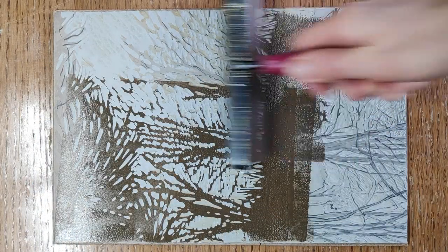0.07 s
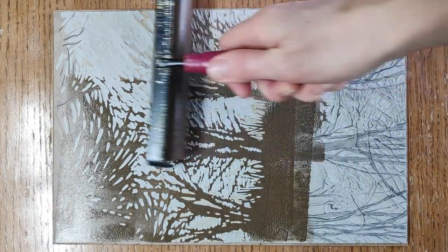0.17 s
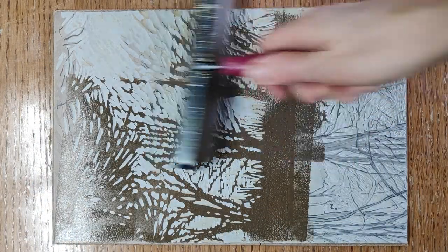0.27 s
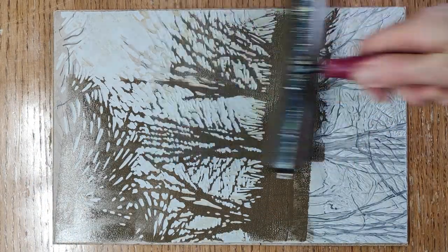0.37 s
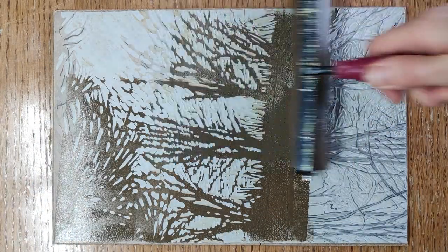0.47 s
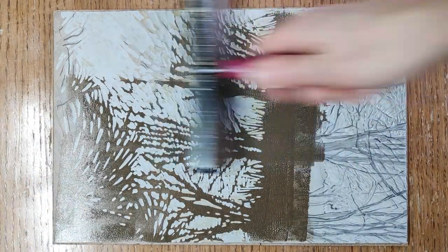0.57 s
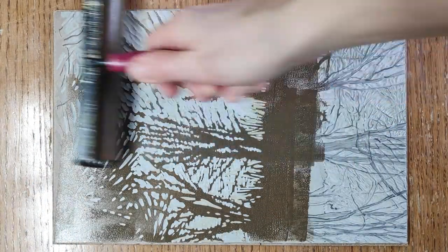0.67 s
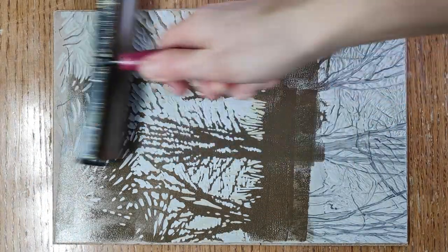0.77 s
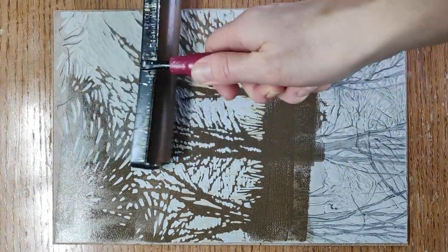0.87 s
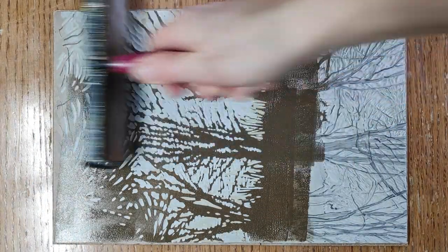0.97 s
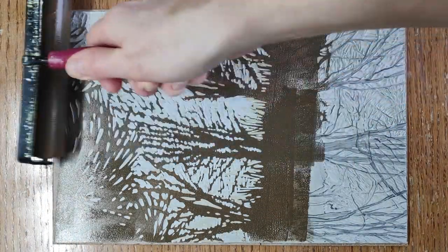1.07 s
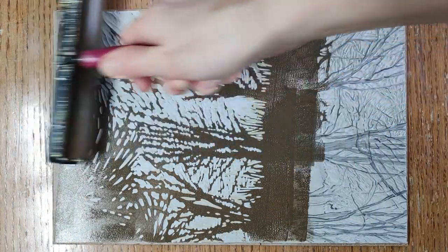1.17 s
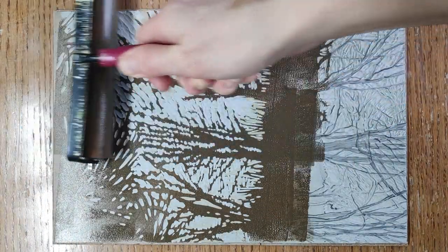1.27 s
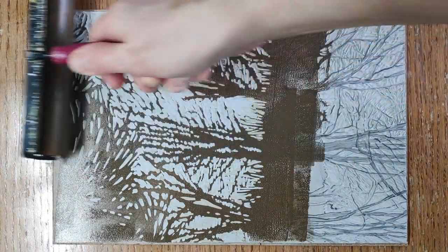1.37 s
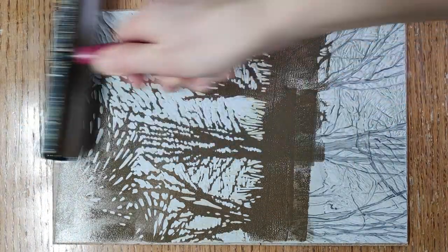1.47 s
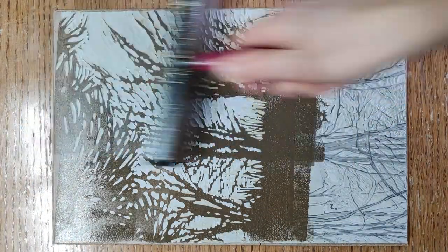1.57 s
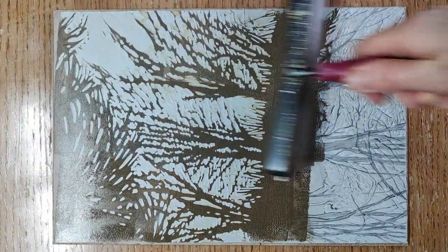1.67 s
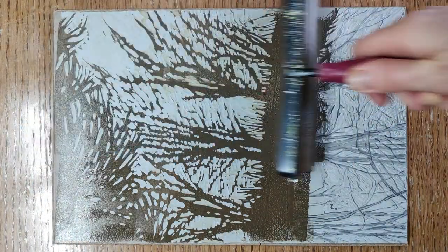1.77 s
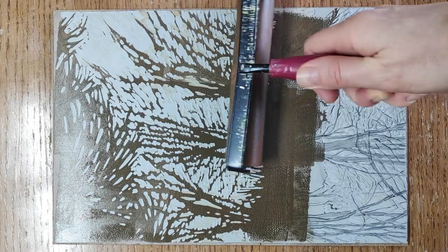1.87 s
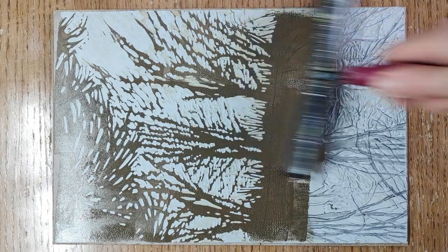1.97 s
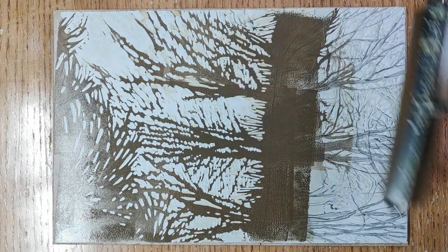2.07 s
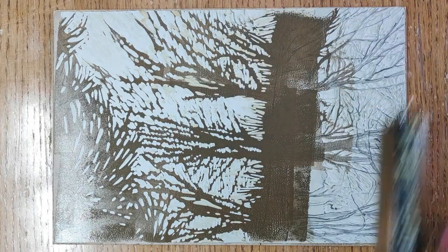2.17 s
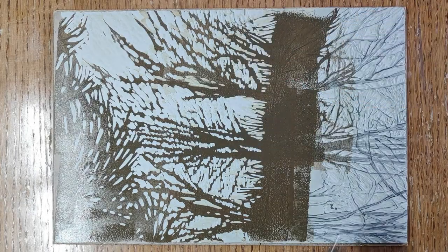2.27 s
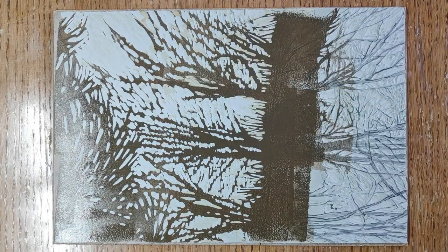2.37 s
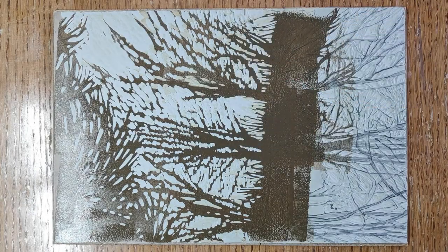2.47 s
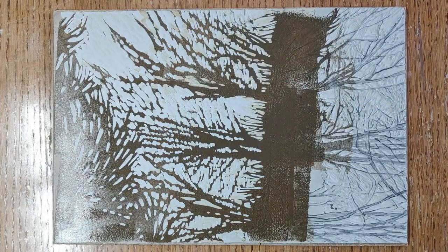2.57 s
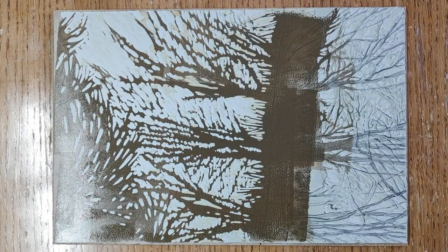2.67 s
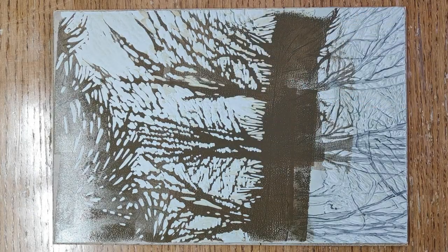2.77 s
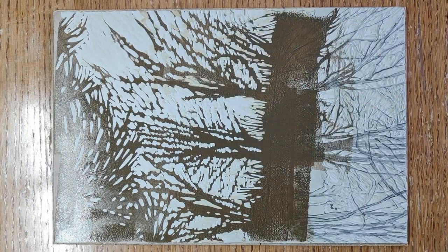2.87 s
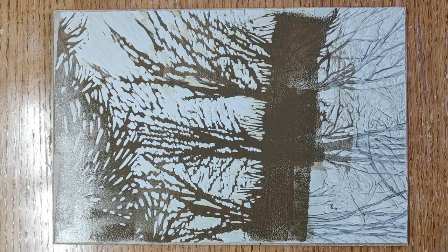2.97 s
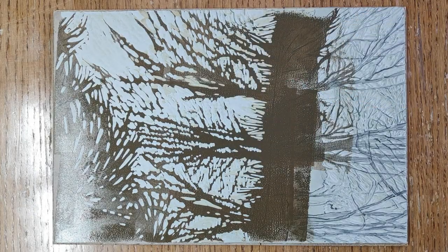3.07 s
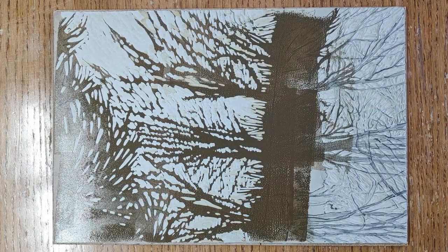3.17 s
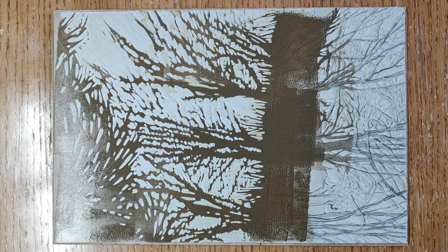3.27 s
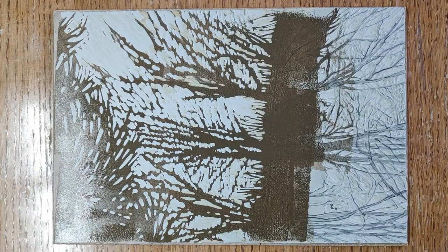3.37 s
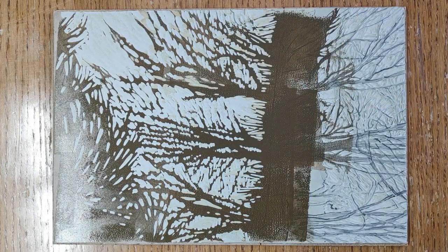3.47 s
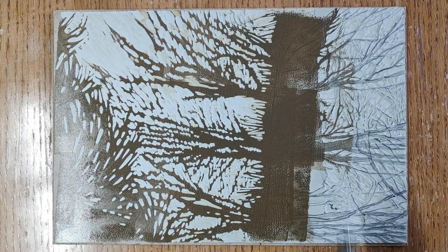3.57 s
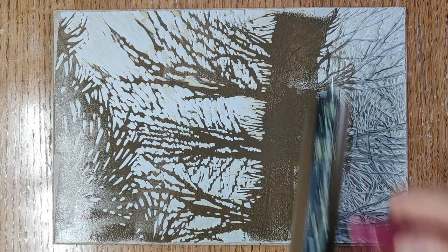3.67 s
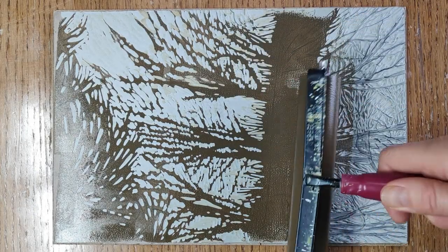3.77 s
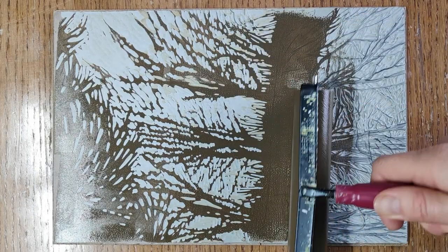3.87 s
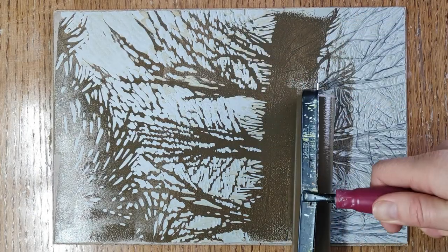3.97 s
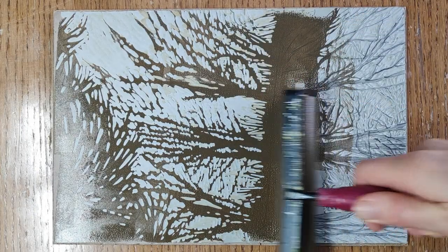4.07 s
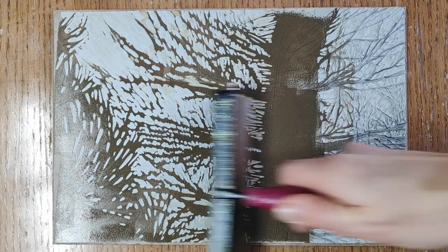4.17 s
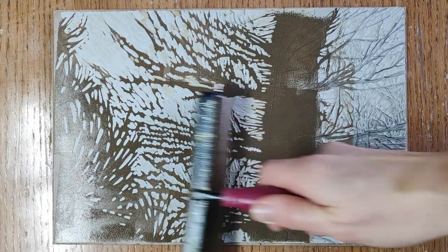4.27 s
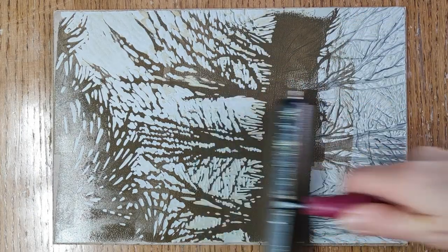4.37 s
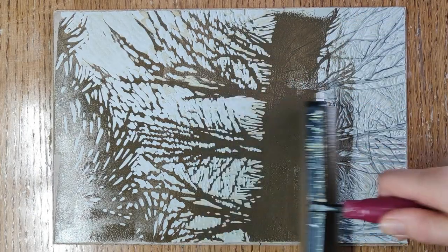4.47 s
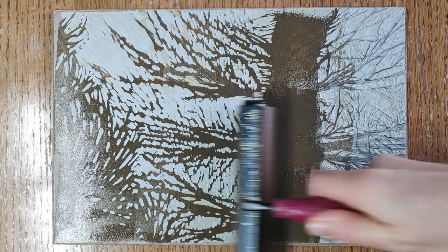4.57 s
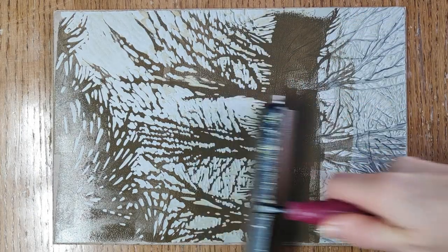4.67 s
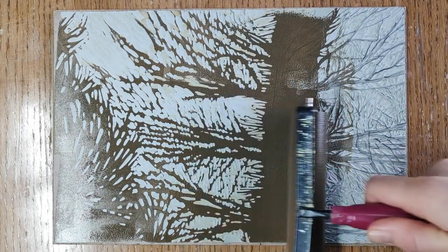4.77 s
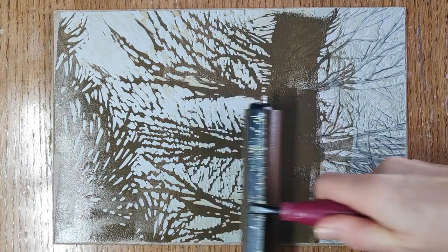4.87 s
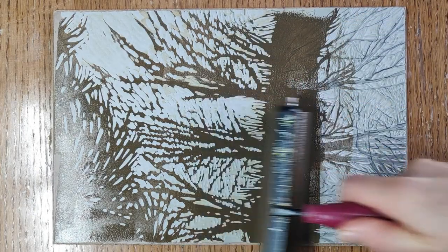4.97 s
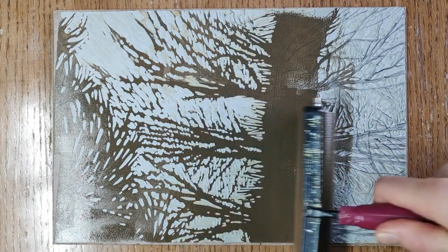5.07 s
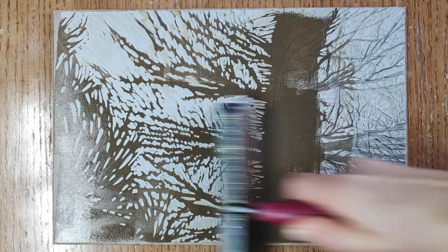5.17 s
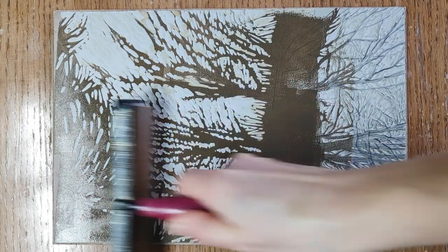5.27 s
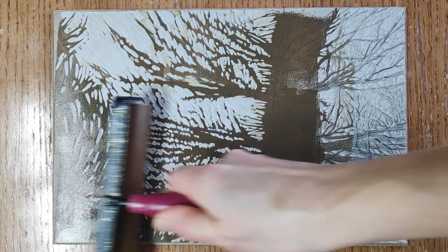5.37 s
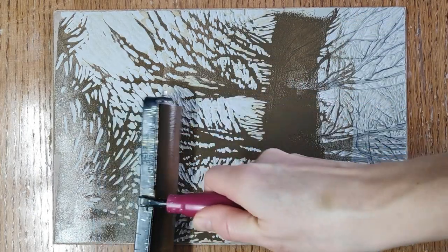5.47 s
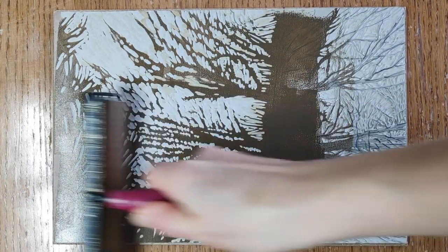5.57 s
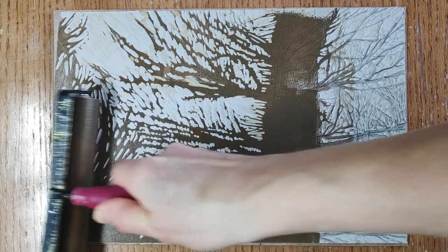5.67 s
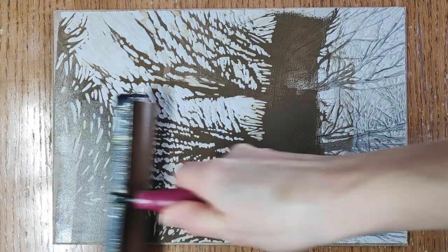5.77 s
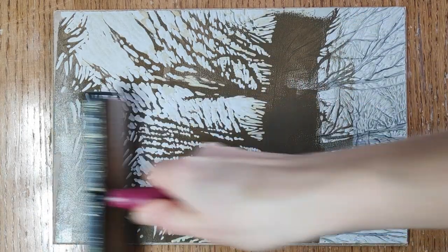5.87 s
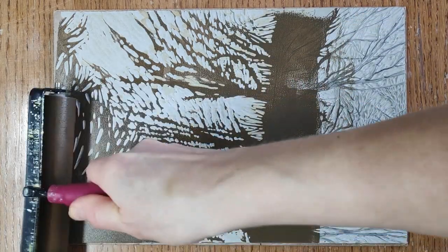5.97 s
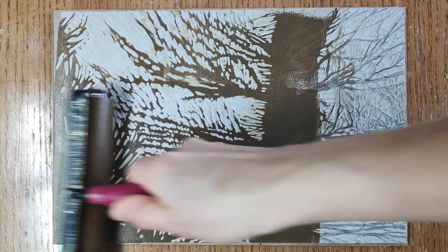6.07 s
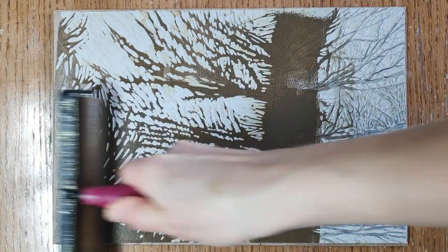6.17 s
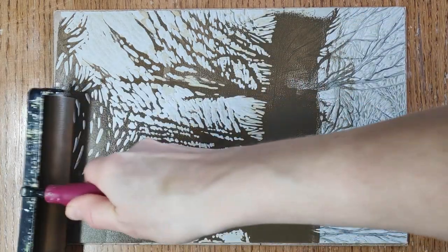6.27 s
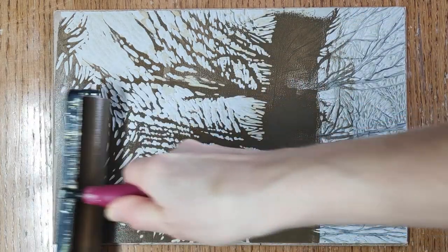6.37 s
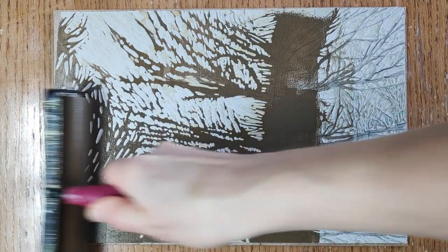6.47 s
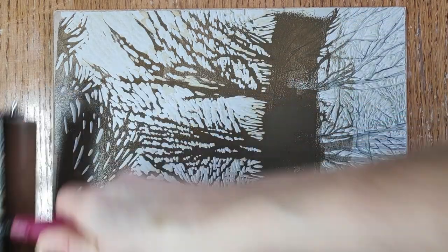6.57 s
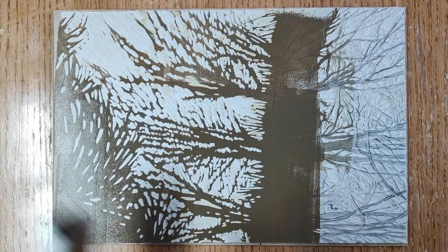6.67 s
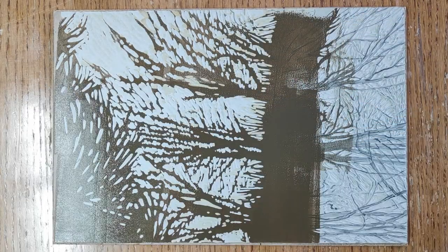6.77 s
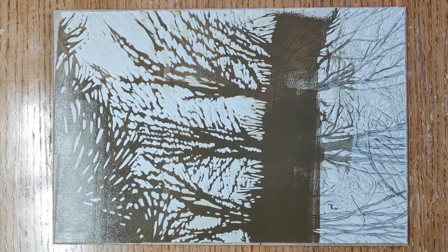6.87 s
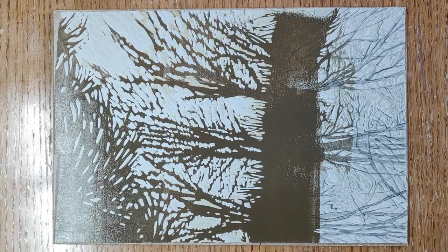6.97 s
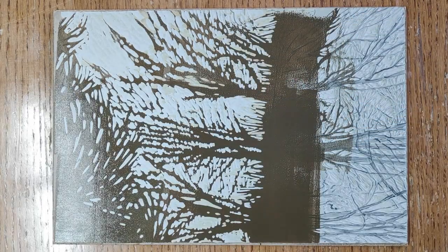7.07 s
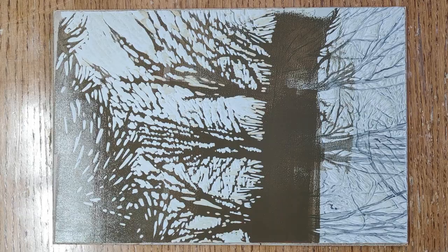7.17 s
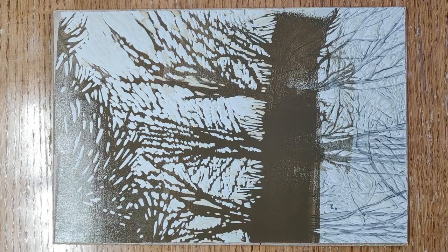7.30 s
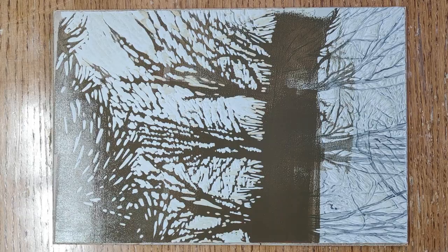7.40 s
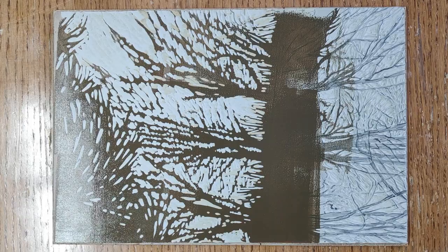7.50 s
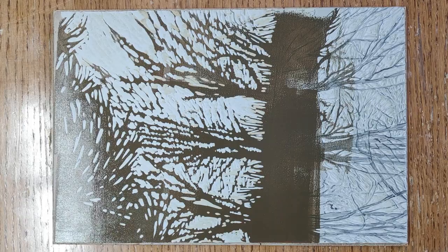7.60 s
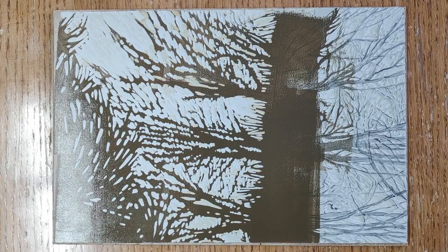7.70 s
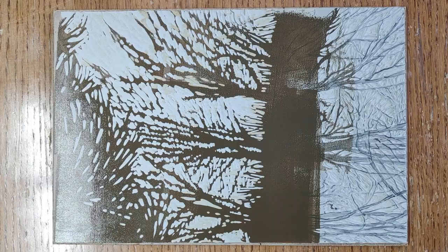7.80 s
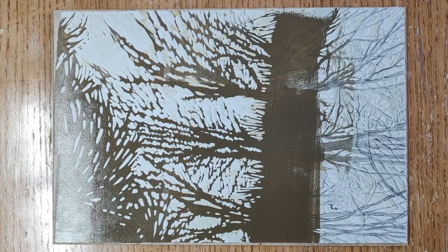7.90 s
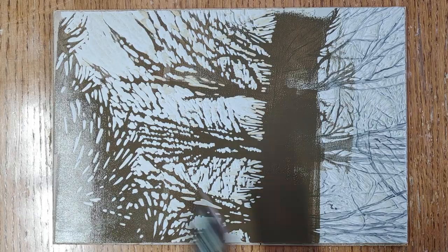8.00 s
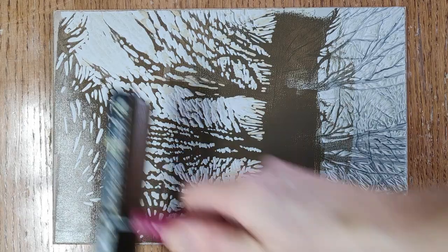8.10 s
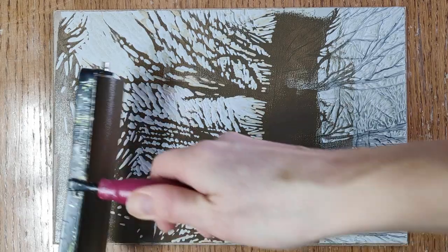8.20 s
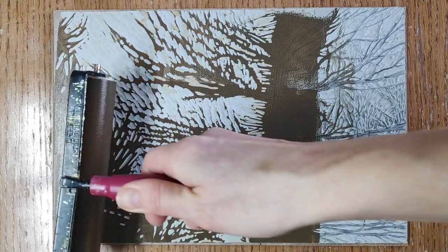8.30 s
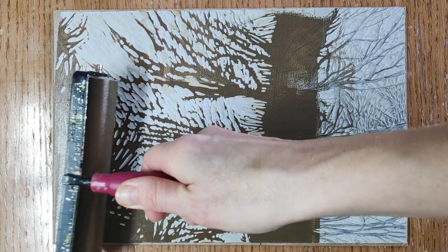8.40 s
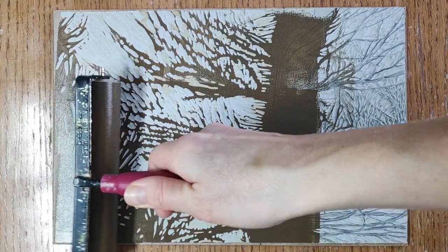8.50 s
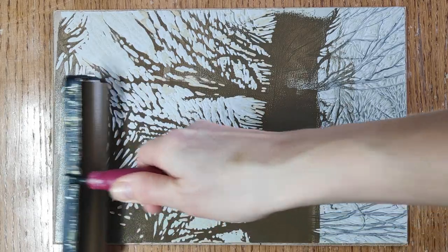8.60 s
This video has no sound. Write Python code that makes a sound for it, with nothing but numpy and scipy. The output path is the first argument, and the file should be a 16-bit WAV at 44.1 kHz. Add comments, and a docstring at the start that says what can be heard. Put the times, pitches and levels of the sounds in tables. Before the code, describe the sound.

A tacky ink roller hisses back and forth over a carved block, rumbling the table, its metal frame rattling whenever it is lifted, re-inked and set down.

```python
"""A hand roller is pushed to and fro over a carved block on a wooden table, and twice re-inked on a slab.
Tacky ink tears with a hiss of shaped noise, and the rubber rasps through resonances of block or slab.
Shaking, jolts over ridges and soft pushes rumble in the table; short chirps sound during strokes on the slab.
The loose metal frame rattles in bright cracks with a knock and a ring, mostly as the roller is lifted or set down.
A quiet room lies beneath, and two small microphone ports each add their own treble peak."""
import sys
import numpy as np
from scipy import signal
from scipy.fft import rfft, irfft, next_fast_len
from scipy.io import wavfile
from scipy.ndimage import uniform_filter1d, map_coordinates

SR = 44100
rng = np.random.default_rng(int(sys.argv[2]) if len(sys.argv) > 2 else 0)


def store_pcm(level_fs):
    """Save levels as 16-bit WAV."""
    pcm = np.round(np.clip(level_fs, -1, 1) * 32767).astype(np.int16)
    wavfile.write(sys.argv[1], SR, np.atleast_2d(pcm).T)


N = 381024

# Quiet room noise: f/Hz, relative level per Hz/dB
AIR = [(25, -1.5), (90, 3.5), (200, -8.5), (350, -11.5), (900, -18.5), (2500, -23), (6000, -24.5),
       (15000, -36)]
# How alike left and right are in the room noise: f/Hz, likeness (-1 to 1)
AIR_ALIKE = [(60, 0.51), (240, 0.73), (950, -0.32), (3770, -0.37), (15000, -0.5)]
# Strokes of the roller: way, start t/s, end t/s, early hiss level/dB, late hiss level/dB,
# rasp level over hiss/dB, rumble level/dB, centre of the rumble f/Hz
STROKES = [("push", 0.0033, 0.27, -52.5, -50, -10, -49.5, 192),
           ("pull", 0.29, 0.51, -57, -41, -11.5, -50, 155),
           ("push", 0.53, 0.82, -43, -57.5, -8, -44.5, 217),
           ("pull", 0.833, 0.97, -52, -65, -10, -48.5, 133),
           ("push", 0.97, 1.163, -53.5, -56, -8.5, -45, 164),
           ("pull", 1.2, 1.312, -61.5, -56, -12, -51, 170),
           ("push", 1.357, 1.494, -53.5, -63.5, -11.5, -52, 210),
           ("pull", 1.493, 1.804, -58, -44, -7, -41.5, 175),
           ("push", 1.8, 1.943, -56.5, -47, -14, -56.5, 210),
           ("pull", 1.963, 2.064, -61.5, -38.5, -12, -52.5, 160),
           ("push", 2.026, 2.128, -55, -41, -10.5, -48, 250),
           ("push", 2.678, 2.921, -49, -34.5, -11, -52, 177),
           ("pull", 2.945, 3.152, -37, -36, -12, -52, 158),
           ("push", 3.16, 3.38, -33.5, -40.5, -13, -53, 176),
           ("pull", 3.383, 3.56, -38, -35, -13.5, -52, 100),
           ("push", 4.06, 4.319, -57.5, -45, -13.5, -48.5, 173),
           ("pull", 4.326, 4.53, -49, -51, -13, -49.5, 154),
           ("push", 4.538, 4.682, -48, -48, -16, -57, 170),
           ("pull", 4.693, 4.814, -62.5, -38, -17, -58, 190),
           ("push", 4.852, 4.971, -51.5, -49, -18, -55.5, 220),
           ("pull", 4.977, 5.158, -58.5, -54.5, -17.5, -64.5, 120),
           ("push", 5.149, 5.267, -51.5, -44.5, -14.5, -54.5, 160),
           ("push", 5.24, 5.413, -53, -65.5, -8.5, -48.5, 157),
           ("pull", 5.411, 5.555, -54.5, -63.5, -12, -58.5, 190),
           ("push", 5.54, 5.718, -58.5, -42.5, -14, -49, 220),
           ("pull", 5.738, 5.881, -50, -51, -12, -44.5, 180),
           ("push", 5.906, 6.053, -43.5, -55, -12, -44.5, 194),
           ("pull", 6.06, 6.2, -58, -49.5, -13, -47, 190),
           ("push", 6.194, 6.347, -47, -58.5, -14, -51, 190),
           ("pull", 6.365, 6.493, -52.5, -61.5, -14, -52, 155),
           ("push", 6.49, 6.62, -54.5, -57, -11, -48, 190), ("push", 7.128, 7.362, -47, -36, -9, -51, 190),
           ("pull", 7.387, 7.599, -37.5, -37.5, -12.5, -51.5, 167),
           ("push", 7.593, 7.787, -38.5, -37.5, -11.5, -53.5, 190),
           ("pull", 7.786, 7.944, -40, -34, -13, -51.5, 133)]
# Time spent on the ink slab: start t/s, end t/s
SLAB_RUNS = [(2.64, 3.66), (7.115, 8.08)]
# The roller tilts with the way it runs, so the hiss leans: way -> left over right level/dB
ON_BLOCK_PAN_DB = {"push": -0.4, "pull": 5.5}
ON_SLAB_PAN_DB = {"push": -1.6, "pull": 1.5}
# The ink lets go all at once as a stroke sets off: t/s, hiss level/dB
GRABS = [(0.853, -62), (2.961, -49.5), (4.3515, -51), (5.918, -59), (6.2128, -56), (6.5141, -56),
         (7.4, -52)]
# Colour of the tearing ink: f/Hz, relative level per Hz/dB
INK = [(2500, -48), (4000, -8), (6000, -4), (9000, -0.5), (12000, 5), (15000, -1)]
# Resonances of the carved block: f/Hz, width/Hz, relative level/dB
BLOCK = [(350, 60, 5.5), (551, 33, 7.5), (747, 180, -3.5), (1027, 61, 2), (1230, 360, -3.5),
         (1736, 410, 1.5), (2400, 1130, -3.5), (3900, 1350, -12.5)]
# Resonances of the ink slab: f/Hz, width/Hz, relative level/dB
SLAB = [(336, 35, 5.5), (423, 46, 5.5), (557, 35, 4.5), (616, 47, 4.5), (760, 240, -3), (1038, 53, 4),
        (1344, 87, 1), (1580, 120, 2.5), (1960, 400, -2), (2704, 235, 1), (3350, 360, -1.5),
        (4400, 450, -0.5)]
# How alike left and right are in rasp and rumble: f/Hz, likeness (-1 to 1)
ALIKE = [(60, 0.94), (180, 1), (550, 0.63), (1650, 0.48), (4970, 0.01), (15000, 0.02)]
# Resonances of the table's boards: f/Hz, width/Hz, relative level/dB
TABLE = [(86.6, 46, -6.5), (100, 24, -2.5), (125.2, 8.3, -1), (174.4, 8.6, -2.5), (204.6, 7.2, -2),
         (233, 24.3, -2.5), (278, 13, -0.5), (344, 43, -8), (416, 50, -7.5), (570, 60, -18.5)]
# The table swaying on its legs: f/Hz, width/Hz, relative level/dB
SWAY = [(37.7, 7, 5.5), (53.7, 19, -8)]
# Roller on the move: start t/s, end t/s
ROLLING = [(0, 2.12), (2.66, 3.56), (4.04, 6.68), (7.13, 7.97)]
# The table shudders on after a landing: t/s, level/dB
LANDINGS = [(2.65, -44), (4.04, -42), (7.126, -41.5), (8.578, -47)]
# The table's sway while it is rolled on: t/s, level/dB
SWAYING = [(0.0, -65), (0.63, -71), (0.82, -59), (1.7, -63), (2.4, -77), (2.63, -82), (2.75, -64),
           (3.5, -58.5), (3.9, -86), (4.02, -85), (4.3, -70), (4.5, -58.5), (5.75, -65.5), (5.92, -60),
           (6.25, -72), (6.6, -64), (7.0, -90), (7.11, -86), (7.25, -61.5), (7.95, -53.5), (8.45, -86)]
# The roller jolts over a tall ridge: t/s, peak level/dB, centre of the boards that answer f/Hz
RIDGES = [(0.164, -41, 230), (0.338, -46, 124), (0.409, -42.5, 195), (0.625, -38, 221), (0.659, -36, 232),
          (0.746, -39, 102), (0.848, -39.5, 119), (1.052, -34.5, 167), (1.089, -36, 186), (1.232, -46, 229),
          (1.402, -40.5, 216), (1.59, -32.5, 96), (1.629, -37, 175), (1.689, -42, 221), (2.059, -46, 240),
          (4.074, -37.5, 129), (4.234, -43.5, 246), (4.38, -43, 131), (5.237, -43.5, 96.9),
          (5.308, -41.5, 205), (5.455, -49, 269), (5.653, -40, 132), (5.679, -39.5, 228), (5.786, -41, 132),
          (5.809, -40.5, 127), (5.955, -38.5, 163), (6.117, -41.5, 223), (6.232, -45, 269),
          (6.271, -43, 230), (6.422, -45.5, 226), (6.549, -41, 226)]
# The roller pushes down on the table, mostly on landing: t/s, push level/dB, contact time/ms
THUMPS = [(1.554, 8, 2.7), (2.646, 6.5, 5.5), (2.655, 8, 2.2), (2.674, 10.5, 2.7), (4.029, 14, 7),
          (4.06, 13.5, 3), (7.124, 16.5, 2.4), (7.143, 14.5, 2.5), (8.578, 13.5, 6.2)]
# The table top gives under the rubber: f/Hz, width/Hz, relative level/dB
BOUNCE = [(106, 100, -0.5)]
# The frame rattles: t/s, peak level of the crack/dB, knock level over that/dB,
# ring level over that/dB, colour of the crack f/Hz
RATTLES = [(2.0895, -23.5, -30, -23, 9600), (2.1009, -37.5, -33, -14, 7000), (2.2992, -52, -22, -32, 7000),
           (2.3452, -37.5, -11, -24, 8550), (2.3489, -41.5, -6, -26, 8500),
           (2.356, -40.5, -9.5, -17.5, 5800), (2.6568, -46.5, -4, -26, 7000), (3.6944, -43, 0, -30, 6000),
           (3.7002, -25, -20, -15.5, 10000), (3.708, -32, -22, -18, 5700),
           (3.7123, -21.5, -28, -23.5, 7400), (3.7157, -32, -35, -26, 7500),
           (3.7229, -28.5, -22, -19, 4400), (4.0391, -29, -30, -25, 10900), (4.0434, -32.5, -18, -22, 4530),
           (4.0517, -36, -13, -29, 7500), (4.0691, -31, -25, -28, 7860), (5.9184, -46, -38, -21, 9000),
           (6.569, -31, -21, -20, 4300), (6.5732, -29, -12.5, -24, 7840), (6.5755, -32, -8, -28, 12000),
           (6.8146, -35, -8, -37, 3520), (7.1259, -38, -4.5, -21, 2800), (8.0494, -50, -30, -35, 5000),
           (8.1074, -36.5, -3, -21, 4800), (8.1145, -35.5, -9.5, -24, 7000),
           (8.1188, -21.5, -35, -20, 12000), (8.1222, -23.5, -23, -25, 7240), (8.1265, -27, -15, -23, 7200),
           (8.5866, -42.5, -11.5, -30, 7200), (8.6355, -48, -20, -30, 9000),
           (8.6385, -24.5, -20, -25, 9100)]
# Ringing modes of the metal frame: f/Hz, relative level/dB, time to fall 60 dB/s
FRAME = [(4400, -4.5, 0.04), (4750, -15, 0.1), (5700, -9, 0.1), (6070, -15, 0.081), (7460, -17, 0.13),
         (7620, -11, 0.14), (7950, -14, 0.11), (9270, -11, 0.11), (10780, -14, 0.1), (12030, -2.5, 0.19),
         (12110, -3.5, 0.15), (13240, -16, 0.1), (14000, -10, 0.15)]
# How long the room's tail lasts: f/Hz, time to fall 60 dB/s
ROOM = [(300, 0.19), (1500, 0.26), (4000, 0.29), (12000, 0.19)]
# Short chirps during strokes on the slab: t/s, peak level/dB
SQUEAKS = [(2.9697, -51), (7.2106, -56), (7.6366, -55), (7.8232, -54)]
# Microphone ports, left then right: resonance f/Hz, sharpness (Q)
PORTS = [(15030, 4.7), (7490, 3.74)]

INK_PATCHY_DB, RASP_PATCHY_DB = 1.9, 3  # how far the colour wanders
# the rumble eases and deepens at each turn, and dies after the lift
TURN_DIP_DB, TURN_HZ, LIFT_T60_S = 10, 127, 0.47
SHUDDER_RISE_S, SHUDDER_T60_S = 0.023, 0.52
STEADY_DB = -3  # the steady shaking, over the stroke's rumble level
JOLT_DB = -8  # the sway a landing starts, over its shudder
# the pressing hand damps the boards; loss an octave off centre
RIDGE_RISE_S, RIDGE_DAMPING_HZ, RIDGE_FOCUS_DB = 0.015, 12, 36
BOARDS_DB = -2  # the boards ringing on after a push, over the give of the table top
RATTLE_PAN_DB, RATTLE_SCATTER_DB = 0.5, 2.5  # left over right, and its scatter
RATTLE_ROOM_DB = -2  # the room over the hit
SNAP = 1.6  # the first instant of a contact, over the crack that follows
# the struck spot colours its crack; modes an octave off it ring weaker
CRACK_SHARPNESS, CRACK_PEAK_DB, RING_FOCUS_DB = 2.7, 3, 4.5
SQUEAK_HZ, SQUEAK_S = 2700, 0.012
ROLL_OFF_HZ, TOP_HZ = 14270, 15585


def amp(db):
    """Turns dB into a gain."""
    return 10 ** (np.asarray(db) / 20)


def unit(x):
    """Scales a signal to an average (RMS) strength of 1."""
    return x / np.sqrt(np.mean(x ** 2) + 1e-20)


def along(points, hz):
    """Reads (Hz, value) points between their frequencies, on a log axis."""
    f, v = np.transpose(points)
    return np.interp(np.log(hz + 1), np.log(f + 1), v)


def filtered(x, response):
    """Shapes x with a gain, possibly complex, for each frequency."""
    m = next_fast_len(N + SR // 2)
    return irfft(rfft(x, m) * response(np.fft.rfftfreq(m, 1 / SR)), m)[..., :N]


def resonant(modes):
    """A body that answers at its resonances, only after being shaken; signs alternate."""
    def response(f):
        return sum((-1) ** k * amp(db) * 1j * f * width / (hz * hz - f * f + 1j * f * width)
                   for k, (hz, width, db) in enumerate(modes))
    return response


def paired(pair, alike):
    """Mixes two unrelated signals into left and right of the given likeness."""
    def shares(hz):
        turn = np.arccos(np.clip(along(alike, hz), -1, 1)) / 2
        return np.array([np.cos(turn), np.sin(turn)])
    mid, side = filtered(pair, shares)
    return np.array([mid + side, mid - side])


def wobble(rate):
    """A smooth random curve, rate knots a second."""
    knots = rng.standard_normal(int(N * rate / SR) + 4)
    return map_coordinates(knots, [np.arange(N) * rate / SR])


def grainy(lump_db, rate):
    """Two noises whose strength wavers together, as contacts make and break."""
    return amp(lump_db * wobble(rate)) * rng.standard_normal((2, N))


def patchy(pair, patchy_db):
    """The colour shifts from moment to moment as the roller meets other ridges and other ink."""
    z = signal.stft(pair, nperseg=1024)[2]
    field = rng.standard_normal(z.shape[1:])
    field = uniform_filter1d(field, size=3, axis=0)  # smooth across frequency
    field = uniform_filter1d(field, size=7, axis=1)  # smooth across time
    return signal.istft(z * amp(patchy_db * unit(field)), nperseg=1024)[1][:, :N]


def lingering(gain, t60, wet_db):
    """The room keeps a noise sounding: its power gains a dying tail."""
    keep = amp(-2 * 60 / (t60 * SR))
    tail_power = signal.lfilter([1 - keep], [1, -keep], gain ** 2)
    return np.sqrt(gain ** 2 + amp(2 * wet_db) * tail_power)


def curves(rows):
    """One value per sample for each column after the time."""
    s, *cols = np.transpose(rows)
    return [np.interp(np.arange(N) / SR, s, c) for c in cols]


def touching(runs):
    """1 during the given runs, with soft 4 ms ends."""
    t = np.arange(N) / SR
    return sum(np.clip(np.minimum(t - a, b - t) / .004, 0, 1) for a, b in runs)


def leaning(pan_db):
    """Left and right gains that differ by pan_db."""
    return amp(pan_db * np.array([[.5], [-.5]]))


def quiet_air():
    """The quiet room: steady noise, coloured and spread between left and right."""
    noise = filtered(rng.standard_normal((2, N)), lambda hz: amp(along(AIR, hz)))
    return amp(-69) * unit(paired(noise, AIR_ALIKE))


def strokes():
    """Each stroke speeds up and slows to a stop: hiss gain per side, rasp gain, and pace 0-1."""
    t = np.arange(N) / SR
    hiss, rasp, pace = np.zeros((2, N)), np.zeros(N), np.zeros(N)
    for way, start, end, first_db, last_db, rasp_db, *_ in STROKES:
        span = slice(round(start * SR), round(end * SR))
        done = np.clip((t[span] - start) / (end - start), 0, 1)
        speed = np.abs(np.sin(np.pi * done ** 0.98)) ** 1.066
        on_slab = any(a < start < b for a, b in SLAB_RUNS)
        pan_db = (ON_SLAB_PAN_DB if on_slab else ON_BLOCK_PAN_DB)[way]
        tear = amp(first_db + (last_db - first_db) * done) * speed
        hiss[:, span] += tear * leaning(pan_db)
        rasp[span] += tear * amp(rasp_db)
        pace[span] = np.maximum(pace[span], speed)
    for s, db in GRABS:
        hiss += amp(db - 60 * np.abs(t - s) / 0.15) * (t >= s)  # falls 60 dB in 0.15 s
    return hiss, rasp, pace


def rasping(pops, body):
    """The rubber catches in grainy contacts that excite the resonances of block or slab."""
    contacts = grainy(lump_db=2.5, rate=450) * amp(1.4 * wobble(30)) + pops
    rubbed = filtered(patchy(contacts, patchy_db=RASP_PATCHY_DB), resonant(body))
    return unit(paired(rubbed, ALIKE))


def rolling(hiss, rub):
    """Ink threads snap in a grainy hiss, a few with a pop, and the rubber rasps in the block or the slab."""
    pop_now = rng.random(N) < 330 / SR  # about 330 pops a second
    pops = pop_now * amp(8.5 + 2.1 * rng.standard_normal(N)) * rng.choice([-1, 1], N)
    threads = grainy(lump_db=2.2, rate=800) * amp(1.27 * wobble(40)) + pops
    threads = patchy(threads, patchy_db=INK_PATCHY_DB)
    ink = unit(filtered(threads, lambda hz: amp(along(INK, hz))))
    block, slab = rasping(pops, BLOCK), rasping(pops, SLAB)
    on_slab = touching(SLAB_RUNS)
    # the thinner film on the block tears brighter: 2 dB more per octave
    thin = filtered(ink, lambda hz: amp(2.0 * np.log2((hz + 1) / 9000)))
    ink = on_slab * ink + (1 - on_slab) * thin
    rasp = on_slab * slab + (1 - on_slab) * block
    return lingering(hiss, 0.27, -2.13) * ink + lingering(rub, 0.23, -1.0) * rasp


def rumble(pace):
    """The carved ridges shake the table; where the roller is decides which modes answer most."""
    t = np.arange(N) / SR
    middles = [((start + end) / 2, db, hz) for way, start, end, *_, db, hz in STROKES]
    stroke_db, stroke_hz = curves(middles)
    rolled = amp(stroke_db - TURN_DIP_DB * (1 - pace)) * touching(ROLLING)
    rolled = lingering(rolled, LIFT_T60_S, -4.5)
    shudder = sum(amp(db - 60 * np.abs(t - s) / SHUDDER_T60_S) * np.clip((t - s) / SHUDDER_RISE_S, 0, 1)
                  for s, db in LANDINGS)
    # the pitch moves towards TURN_HZ when slow, or when a shudder takes over
    centre_hz = TURN_HZ * (stroke_hz / TURN_HZ) ** (pace * rolled / (rolled + shudder + 1e-9))

    def soft(hz):  # soft rubber passes no sharp jolts
        return hz ** 2 / (hz ** 2 + 65 ** 2) / (1 + (hz / 330) ** 4)
    shake = filtered(grainy(lump_db=1.7, rate=28), soft)
    rung = filtered(shake, lambda hz: np.array([resonant([mode])(hz) for mode in TABLE])[:, None])
    boards = sum(amp(-18 * np.log2(mode[0] / centre_hz) ** 2) * ring for mode, ring in zip(TABLE, rung))
    legs = filtered(rng.standard_normal((2, N)), resonant(SWAY))
    sway_db, = curves(SWAYING)
    boards_gain = np.hypot(rolled, shudder) * amp(STEADY_DB)
    legs_gain = np.hypot(amp(sway_db), amp(JOLT_DB) * shudder)
    return paired(boards_gain * unit(boards) + legs_gain * unit(legs), ALIKE)


def ridges():
    """Each jolt swells in the table's boards nearest its centre and dies under the hand."""
    out, t = np.zeros(N + SR), np.arange(SR // 4) / SR
    for s, db, centre_hz in RIDGES:
        ring = np.zeros(len(t))
        for hz, width, level in TABLE:
            strength = amp(level - RIDGE_FOCUS_DB * np.log2(hz / centre_hz) ** 2)
            fade = np.exp(-np.pi * (width + RIDGE_DAMPING_HZ) * t)
            phase = 2 * np.pi * rng.random()
            ring += strength * fade * np.sin(2 * np.pi * hz * t + phase)
        ring *= 1 - np.exp(-t / RIDGE_RISE_S)
        out[round(s * SR):][:len(t)] += amp(db) * ring / np.abs(ring).max()
    return out[:N]


def thumps():
    """Soft rubber gives the table one smooth push; its top gives and its boards ring on."""
    push = np.zeros(N + SR)
    for s, db, ms in THUMPS:
        shape = np.hanning(max(round(ms * SR / 1000), 8))
        push[round(s * SR):][:len(shape)] -= amp(db) * shape / shape.sum()
    return filtered(push[:N], lambda hz: resonant(BOUNCE)(hz) ** 2 + amp(BOARDS_DB) * resonant(TABLE)(hz))


def room(x):
    """A fresh stereo tail in which each frequency dies at its own speed."""
    hz, t, z = signal.stft(rng.standard_normal((2, len(x))), SR, nperseg=256)
    tail = signal.istft(z * amp(-60 * t / along(ROOM, hz)[:, None]), SR, nperseg=256)[1]
    return signal.fftconvolve(x[None], tail / np.linalg.norm(tail[0]), axes=1)[:, :len(x)]


def rattles():
    """Each contact is a bright crack, a dull knock of the handle and the ring of the frame."""
    out, t = np.zeros((2, N + SR)), np.arange(SR // 4) / SR
    rise = 1 - np.exp(-t / .00015)
    for s, db, knock_db, ring_db, crack_hz in RATTLES:
        pan_db = rng.normal(RATTLE_PAN_DB, RATTLE_SCATTER_DB)
        burst = amp(-60 * t / .0055) * rng.standard_normal(len(t))
        # a short filter that keeps the treble around 11 kHz
        bright = np.convolve(burst + SNAP * (t == 0), [.3, 0, -.6, 0, .3])[:len(t)]
        coloured = signal.lfilter(*signal.iirpeak(crack_hz, CRACK_SHARPNESS, SR), burst)
        crack = 0.6 * bright + amp(CRACK_PEAK_DB) * coloured
        crack = crack / np.abs(crack).max()
        tones = np.sin(2 * np.pi * 1850 * t) + 0.37 * np.sin(2 * np.pi * 620 * t)
        knock = amp(knock_db - 60 * t / 0.006) * (tones + 2.25 * rng.standard_normal(len(t)))
        chatter = np.cumsum(0.035 * rng.standard_normal(len(t)))  # loose joints blur the phase
        ring = np.zeros(len(t))
        for hz, level, t60 in FRAME:
            off_spot_db = RING_FOCUS_DB * np.log2(hz / crack_hz) ** 2
            mode_db = ring_db + level - off_spot_db + rng.normal(0, 2.6)
            ring += amp(mode_db - 60 * t / t60) * np.sin(2 * np.pi * hz * t + chatter)
        hit = amp(db) * (crack + rise * (knock + ring))
        start = round(s * SR)
        out[:, start:start + len(t)] += hit * leaning(pan_db) + amp(RATTLE_ROOM_DB) * room(hit)
    return out[:, :N]


def squeaks():
    """Brief chirps of one steady pitch that swell and fade."""
    out, t = np.zeros(N), np.arange(round(SQUEAK_S * SR)) / SR
    chirp = np.sqrt(np.hanning(len(t))) * np.sin(2 * np.pi * SQUEAK_HZ * t)
    for s, db in SQUEAKS:
        out[round(s * SR):][:len(t)] += amp(db) * chirp
    return out


def scene():
    """Adds up the quiet room, the roller, the table and the frame."""
    air = quiet_air()
    hiss, rub, pace = strokes()
    return air + rolling(hiss, rub) + rumble(pace) + ridges() + thumps() + rattles() + squeaks()


def ports(hz):
    """Each port is a small cavity: flat, then a peak, then a fall."""
    return np.array([1 / (1 - (hz / c) ** 2 + 1j * hz / (c * q)) for c, q in PORTS])


def record(dry):
    """The ports colour the sound, the preamp hisses, and the top treble drops away, then stops."""
    picked = filtered(dry, ports) + amp(-72) * rng.standard_normal(dry.shape)

    def treble_end(hz):  # down 60 dB within 250 Hz, silent from TOP_HZ up
        return amp(-60 * np.clip((hz - ROLL_OFF_HZ) / 250, 0, 1)) * (hz < TOP_HZ)
    return filtered(picked, treble_end)


dry = scene()
out = record(dry)
store_pcm(out)
```